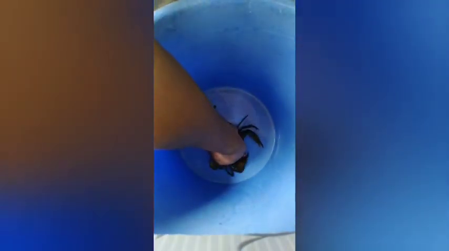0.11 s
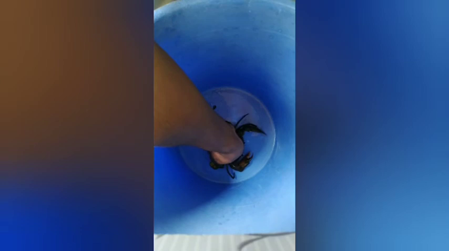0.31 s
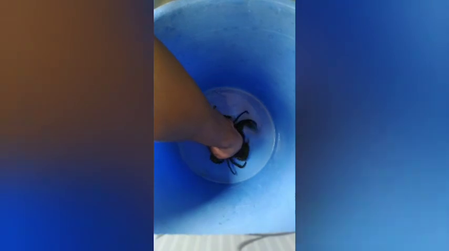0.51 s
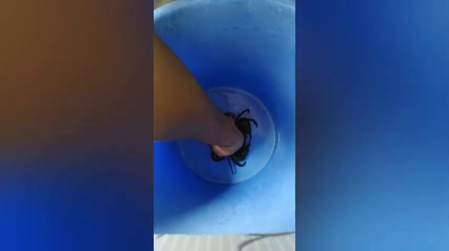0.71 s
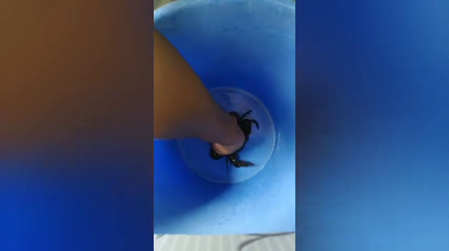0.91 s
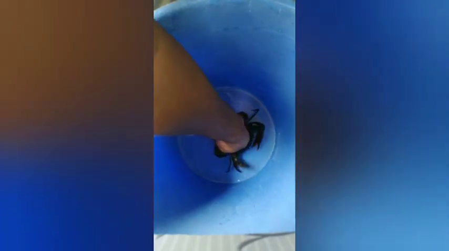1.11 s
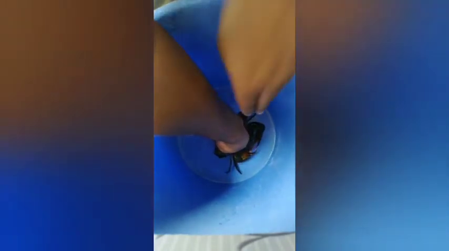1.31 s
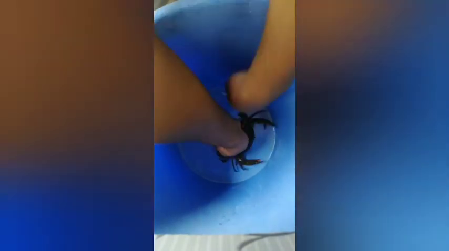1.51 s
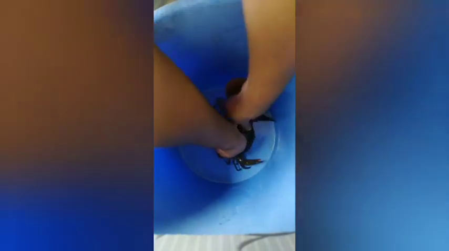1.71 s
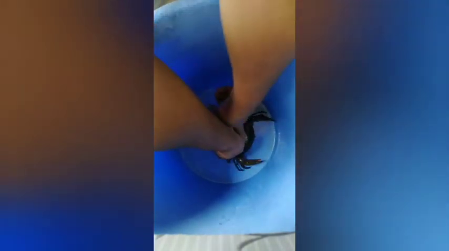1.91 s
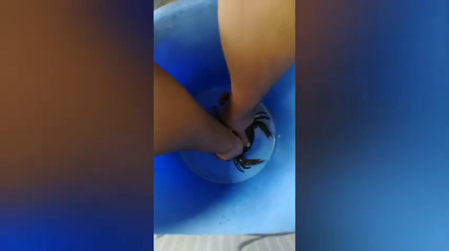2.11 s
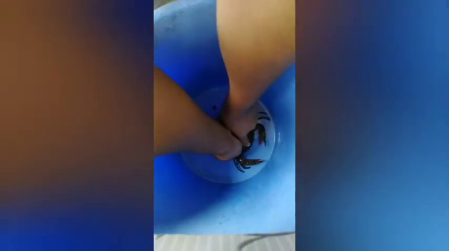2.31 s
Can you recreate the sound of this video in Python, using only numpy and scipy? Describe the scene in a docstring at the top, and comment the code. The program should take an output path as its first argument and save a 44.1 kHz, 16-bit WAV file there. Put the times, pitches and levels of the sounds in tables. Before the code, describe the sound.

Close scratching of a crab struggling in a plastic tub comes in uneven bursts, mixed with sharp clicks and hollow bumps, mostly to the right. It thins out, and fingers faintly rub the plastic over a low hiss.

```python
"""A crab struggles, held down in a thin plastic tub that stands in a plastic bucket.
Its legs scrape the wall in bursts of tiny slips, its claws tick and squeak, the wall catches and
knocks, and its body bumps the hollow floor. Near the end, fingers softly rub the tub.
The bucket adds a short, close ring; most of it sounds to the right, over a faint hiss."""
import sys
import numpy as np
from scipy import signal
from scipy.fft import rfft, irfft
from scipy.io import wavfile

SR = 44100
rng = np.random.default_rng(int(sys.argv[2]) if len(sys.argv) > 2 else 0)


def persist_wave(psi):
    """Save psi, clipped to +-1, as 16-bit WAV."""
    counts = np.round(np.clip(psi, -1, 1) * 32767).astype(np.int16)
    wavfile.write(sys.argv[1], SR, np.atleast_2d(counts).T)


N = 105840
TIME = np.arange(N) / SR
STRIKE_RISE_S, DRAG_FADE_S = 0.00075, 0.0083

# Leg strokes on the wall. Each row: start in seconds, length in seconds, wall judder in dB,
# tip grit in dB, pan in dB (positive is left).
LEG_STROKES = [(0.158, 0.096, -40.5, -45, -14), (0.193, 0.049, -31.5, -40, -24),
               (0.342, 0.1, -30.5, -40.5, -14.5), (0.374, 0.059, -32, -23, -11),
               (0.444, 0.036, -27.5, -22.5, -5), (0.464, 0.039, -23, -21.5, -10),
               (0.495, 0.027, -19, -32, -2), (0.57, 0.026, -23, -38, -20), (0.626, 0.019, -26, -25.5, -24),
               (0.673, 0.049, -23, -28.5, -13.5), (0.733, 0.026, -26.5, -40.5, -17),
               (0.762, 0.016, -20.5, -37, -21), (0.798, 0.12, -43, -48.5, -17),
               (0.899, 0.08, -23.5, -23.5, -24.5), (0.987, 0.026, -21.5, -32, -18.5),
               (1.02, 0.039, -20.5, -26, -24), (1.047, 0.065, -22.5, -21, -24.5),
               (1.123, 0.02, -22, -37, -16), (1.214, 0.0063, -34.5, -38.5, -31),
               (1.267, 0.024, -35, -46.5, -24), (1.283, 0.056, -32.5, -40.5, -33),
               (1.339, 0.03, -34.5, -42.5, -8), (1.441, 0.039, -35.5, -39.5, -9.5)]
# Resonances of the tub wall. Each row: centre in Hz, width in Hz, lift in dB.
WALL_RESONANCES = [(687, 198, 5.5), (1063, 30, 8), (1192, 87, 3), (1460, 107, 0.5)]
# Brighter resonances of the leg and claw tips. Each row: centre in Hz, width in Hz, lift in dB.
TIP_RESONANCES = [(2460, 280, 11), (2670, 52, 3), (3416, 140, 5.4)]


def from_db(db):
    return 10 ** (np.asarray(db) / 20)


def pan(pan_db):
    """Left and right gains; positive leans left, and the nearer side stays at 1."""
    return from_db([[min(pan_db, 0)], [min(-pan_db, 0)]])


def through(x, response):
    return signal.fftconvolve(np.atleast_2d(x), np.atleast_2d(response), axes=1)[:, :N]


def filtered(x, kind, hz, order=2):
    return signal.sosfilt(signal.butter(order, hz, kind, fs=SR, output="sos"), x)


def resonator(colour, peaks=(), size=8192):
    """Minimum-phase impulse response of a tone colour with resonances on it; energy 1."""
    hz = np.maximum(np.arange(size // 2 + 1) * SR / size, 1)
    colour_hz, colour_db = np.transpose(colour)
    db = np.interp(np.log(hz), np.log(colour_hz), colour_db)
    for centre, width, lift in peaks:
        db += lift / (1 + (2 * (hz - centre) / width) ** 2)
    cepstrum = irfft(np.log(from_db(db)))[:size // 2]
    response = irfft(np.exp(2 * rfft(cepstrum, size)))[:size // 2]
    return response / np.linalg.norm(response)


def drift(per_s):
    """A random wander that glides to a new value per_s times a second."""
    return np.interp(TIME * per_s, np.arange(N), rng.standard_normal(N))


def slips(per_s, spread_db):
    """Dense stick-slip clicks of uneven size under a grip that tightens and loosens; rms 1."""
    sizes = from_db(spread_db * np.minimum(rng.exponential(1, N), 4)) * rng.choice([-1, 1], N)
    slipping = rng.random(N) < per_s / SR
    grip = from_db(4 * drift(per_s=110))
    clicks = sizes * slipping * grip
    return clicks / np.sqrt(np.mean(clicks ** 2) + 1e-20)


def pressure(start, length, rise_s, fall_s):
    """Contact pressure rises, holds and dies away."""
    rise = np.clip((TIME - start) / rise_s, 0, 1)
    return rise * np.exp(-np.clip((TIME - start - length) / fall_s, 0, 20))


def echoes(t60_s):
    """Dense dying reflections, different on each side; energy 1."""
    tail = rng.standard_normal((2, SR // 2)) * from_db(-60 * TIME[:SR // 2] / t60_s)
    return tail / np.linalg.norm(tail, axis=1, keepdims=True)


def leg_scrapes():
    """Each stroke shakes the wall's resonances and throws off fine grit from the leg tips."""
    # Tone colours of the wall's judder and the tips' grit. Each row: frequency in Hz, level in dB.
    judder_colour = [(40, -58), (130, -9.5), (270, -3.5), (480, -7.5), (850, -1.5), (1450, 1), (1850, -18),
                     (3000, -10.5), (8000, -66.5)]
    grit_colour = [(300, -22.5), (1200, -3.5), (2000, -5.5), (3300, -0.5), (5000, -5.5), (7500, -13.5),
                   (8800, -28.5), (12000, -35.5), (16000, -70)]
    judder_power, grit_power = 0, 0
    for start, length, judder_db, grit_db, pan_db in LEG_STROKES:
        press = pan(pan_db) * pressure(start, length, 0.33 * length, DRAG_FADE_S)
        judder_power += (from_db(judder_db) * press) ** 2
        grit_power += (from_db(grit_db) * press) ** 2
    judder = np.sqrt(judder_power) * slips(per_s=2600, spread_db=1)
    grit = np.sqrt(grit_power) * slips(per_s=5000, spread_db=1.5)
    return (through(judder, resonator(judder_colour, WALL_RESONANCES))
            + through(grit, resonator(grit_colour, TIP_RESONANCES)))


def claw_ticks():
    """A claw tip strikes the wall and skids briefly; the smaller the tip, the higher its band."""
    # Claw strikes. Each row: start in seconds, level in dB, decay in seconds,
    # low and high band edges in Hz, pan in dB.
    strikes = [(0.431, -3, 0.0014, 2660, 6940, 0), (0.461, -16, 0.026, 7850, 16500, -17),
               (0.483, -15, 0.0091, 1500, 15000, -24), (0.623, -26.5, 0.033, 2150, 13000, -31),
               (0.687, -17, 0.0062, 675, 15600, -38), (1.143, -14.5, 0.0025, 3400, 8700, -24),
               (1.215, -31, 0.013, 4760, 15000, -22), (1.448, -21.5, 0.0092, 565, 5100, -36),
               (1.981, -30.5, 0.015, 504, 14200, -12.5)]
    # Tone colour of a strike. Each row: frequency in Hz, level in dB.
    tick_colour = [(1100, 2), (2000, -4.5), (3200, -5.5), (7000, -6), (9000, -18.5), (16000, -31.5)]
    out, skid = 0, slips(per_s=7000, spread_db=2)
    for start, db, decay_s, low_hz, high_hz, pan_db in strikes:
        burst = skid * pressure(start, STRIKE_RISE_S, STRIKE_RISE_S, decay_s)
        out += from_db(db) * pan(pan_db) * filtered(burst, "band", [low_hz, high_hz])
    return through(out, resonator(tick_colour, WALL_RESONANCES + TIP_RESONANCES))


def wall_knocks():
    """The wall catches, springs free and rings hollow for a few cycles, with a weaker, lower mode."""
    # Releases of the wall. Each row: start in seconds, level in dB, pitch in Hz.
    releases = [(1.095, -12, 1444), (1.109, -11, 1177), (1.302, -20, 1360), (1.307, -22.5, 1210),
                (1.319, -17, 1243), (1.327, -13.5, 1440), (1.45, -21.5, 1012), (1.499, -30, 1110),
                (1.982, -37, 1394), (1.985, -28.5, 677)]
    out = 0
    for start, db, hz in releases:
        phase = 2 * np.pi * hz * (TIME - start)
        ring = np.sin(phase) + from_db(-6.5) * np.sin(0.606 * phase)
        out += from_db(db) * ring * pressure(start, STRIKE_RISE_S, STRIKE_RISE_S, fall_s=0.0058)
    return pan(-16.5) * out


def leg_squeaks():
    """A leg sticks and slips evenly, locked to a resonance: a rough tone with its octave."""
    # Squeaks on the wall. Each row: start and length in seconds, level in dB, pitch in Hz, pan in dB.
    squeaks = [(0.433, 0.0027, -12, 1769, 14), (0.442, 0.0065, -15.5, 1720, 24),
               (0.443, 0.0034, -17, 3270, -3), (0.467, 0.033, -21, 1720, 28),
               (0.923, 0.043, -23.5, 2434, -15.5), (1.046, 0.023, -20.5, 1186, -29)]
    jitter, octave_db, edge_s = 0.055, -12, 0.00086
    out, wavering_time = 0, np.cumsum(1 + jitter * drift(per_s=1500)) / SR
    for start, length, db, hz, pan_db in squeaks:
        phase = 2 * np.pi * hz * wavering_time
        tone = np.sqrt(2) * (np.sin(phase) + from_db(octave_db) * np.sin(2 * phase))
        out += from_db(db) * pan(pan_db) * tone * pressure(start, length, edge_s, edge_s)
    return out


def floor_bumps():
    """The body bumps and chatters on the hollow floor; where it lands decides which modes lead."""
    # Landings of the body. Each row: start in seconds, level in dB, leading pitch in Hz.
    landings = [(0.227, -30, 229), (0.415, -28, 206), (0.4962, -14.5, 350), (.525, -21, 330),
                (.643, -19, 286), (.687, -14, 248), (0.709, -24.5, 260), (1.005, -22, 196),
                (1.087, -20, 290), (1.112, -17, 239), (1.139, -23.5, 277), (1.217, -35.5, 287),
                (1.461, -37.5, 160), (1.589, -34.5, 183), (2.279, -35.5, 228)]
    # Modes of the floor. Each row: frequency in Hz, level in dB, seconds to fall by 60 dB.
    floor_modes = [(139, -3, 0.059), (198.3, -2.5, 0.051), (227.7, 1.5, 0.15), (268.4, -3.5, 0.11),
                   (323.6, -1, 0.065), (347.7, -4, 0.11), (466, -1, 0.071), (684, 4, 0.05)]
    rise_s, chatter_s, focus_db_per_octave = 0.00066, 0.015, 13
    out, t = 0, TIME[:SR // 2]
    leg_starts, *_, leg_pans = np.transpose(LEG_STROKES)
    chatter = from_db(0.5) * slips(per_s=830, spread_db=2) / np.sqrt(chatter_s * SR / 2)
    chatter = filtered(chatter, "high", 370)  # too light to move the lowest modes
    for start, db, lead_hz in landings:
        ring = 0
        for k, (hz, mode_db, t60_s) in enumerate(floor_modes):
            struck_db = mode_db - focus_db_per_octave * abs(np.log2(hz / lead_hz))
            ring += (-1) ** k * from_db(struck_db - 60 * t / t60_s) * np.sin(2 * np.pi * hz * t)
        ring *= 1 - np.exp(-t / rise_s)
        force = chatter * pressure(start, 0, rise_s, chatter_s)
        force[int(start * SR)] += 1  # the blow itself
        pan_db = 0.69 * np.interp(start, leg_starts, leg_pans)  # with the legs, but nearer the middle
        out += from_db(db) * pan(pan_db) * through(force, ring)
    return filtered(out, "high", 87)


def finger_rubs():
    """Soft skin drags over the plastic; a rough ring sinks as each drag slows."""
    # Finger drags. Each row: start in seconds, length in seconds, level in dB.
    drags = [(2.135, 0.11, -50.5), (2.215, 0.065, -44.5)]
    # Tone colour of skin on plastic. Each row: frequency in Hz, level in dB.
    skin_colour = [(100, -22), (330, 3), (750, 2.5), (1400, -12), (6000, -21.5), (16000, -56)]
    ring_hz, sag_hz_per_s = 830, 1120
    out, grain = 0, through(slips(per_s=2000, spread_db=2.4), resonator(skin_colour))
    for start, length, db in drags:
        t = TIME - start
        flutter = from_db(3.5) * drift(per_s=280)
        ring = flutter * np.sin(2 * np.pi * (ring_hz - sag_hz_per_s * t / 2) * t)
        out += from_db(db) * pressure(start, length, DRAG_FADE_S, DRAG_FADE_S) * (grain + ring)
    return pan(-9) * out


def bucket(x):
    """Close reflections between the bucket's walls; the left side hears more of them."""
    wet = from_db([[-1], [-6]])
    return (x + wet * through(x, echoes(t60_s=0.098))) / np.sqrt(1 + wet ** 2)


def room_tail(x):
    """The room returns a faint, dull wash of reflections."""
    dulled = filtered(x.mean(axis=0), "low", 3300, order=1)
    return from_db(-21.5) * through(dulled, echoes(t60_s=0.91))


def hiss():
    """Steady background noise, partly shared by both sides."""
    # Tone colour of the background. Each row: frequency in Hz, level in dB.
    hiss_colour = [(25, -29), (70, -8.5), (130, 11), (280, 4), (620, 6.5), (1100, -3.5), (2500, -4.5),
                   (7600, -9.5), (8600, -25.5), (16000, -33.5)]
    noise, shared = rng.standard_normal((3, N)), 0.22
    stereo = np.sqrt(1 - shared) * noise[:2] + np.sqrt(shared) * noise[2]
    return from_db(-56) * through(stereo, resonator(hiss_colour))


def scene():
    """Wall contacts ring in the bucket over the floor bumps, reaching the left side a little later."""
    left_lag_s = 0.00041
    contacts = leg_scrapes() + claw_ticks() + wall_knocks() + leg_squeaks() + finger_rubs()
    left, right = bucket(contacts) + floor_bumps()
    near = np.array([np.interp(TIME - left_lag_s, TIME, left), right])
    return near + room_tail(near) + hiss()


def record(dry):
    """A steep low-pass trims the very top of the treble."""
    cutoff_hz = 15850
    return signal.sosfilt(signal.ellip(10, .2, 80, cutoff_hz, fs=SR, output="sos"), dry)


dry = scene()
out = record(dry)
persist_wave(out)
```